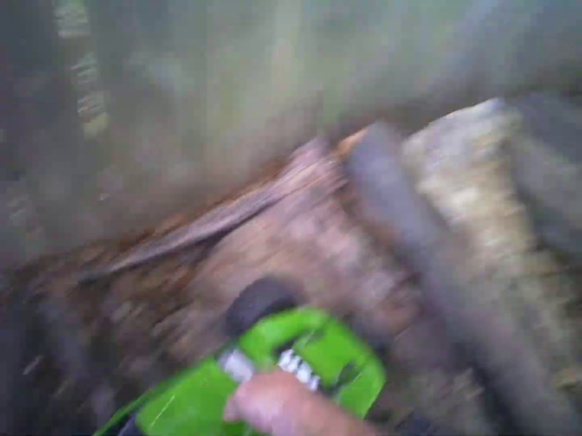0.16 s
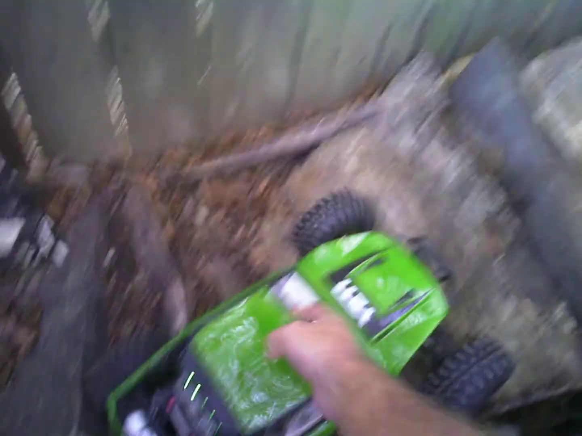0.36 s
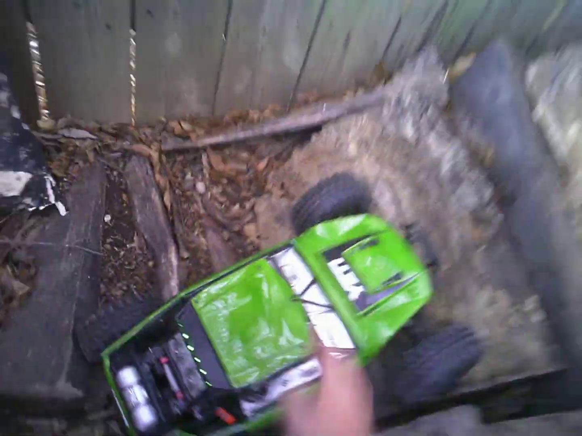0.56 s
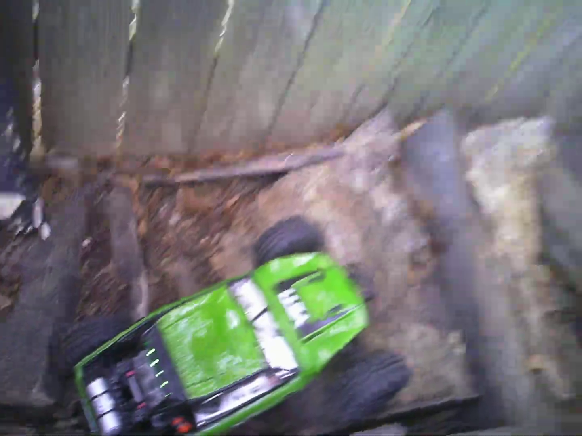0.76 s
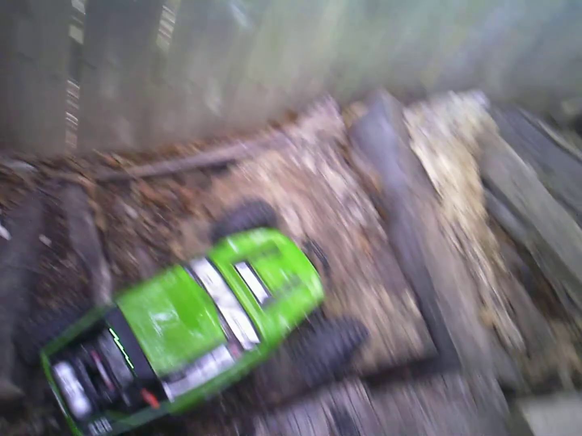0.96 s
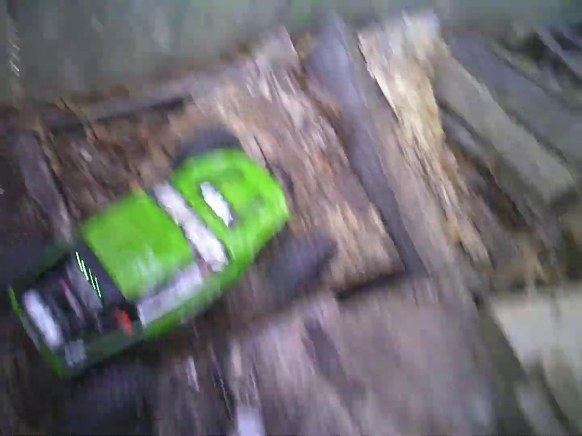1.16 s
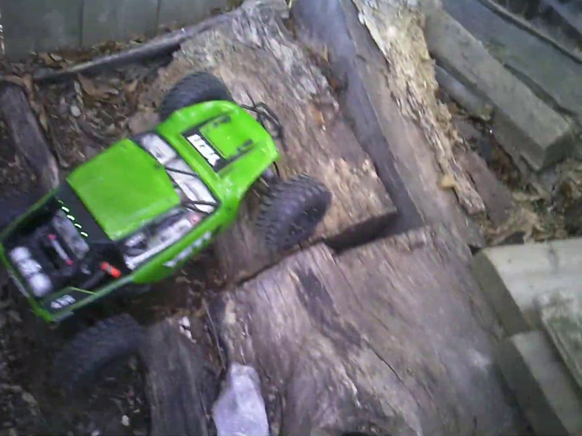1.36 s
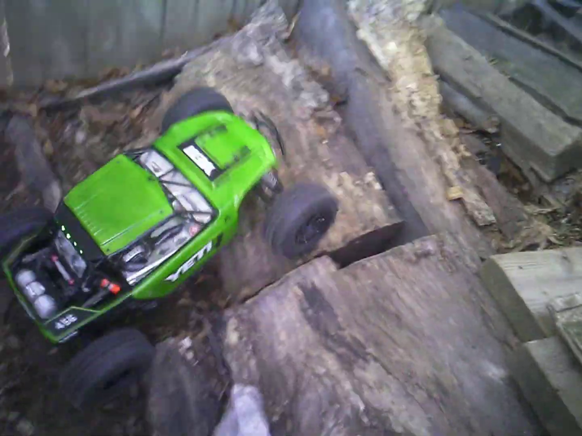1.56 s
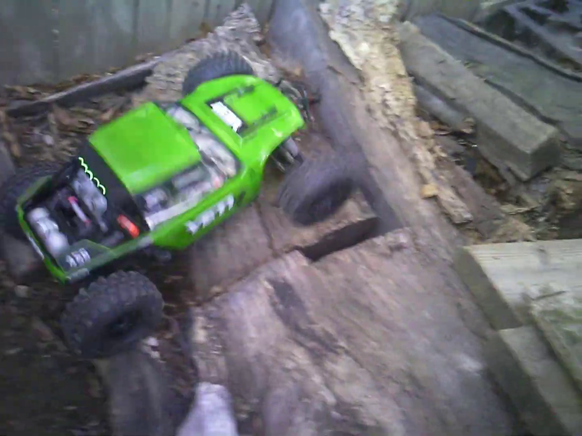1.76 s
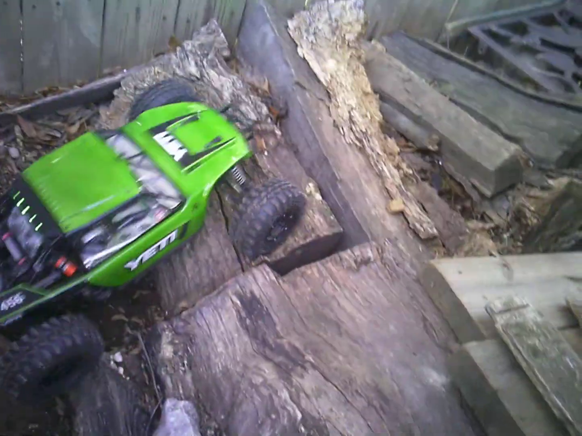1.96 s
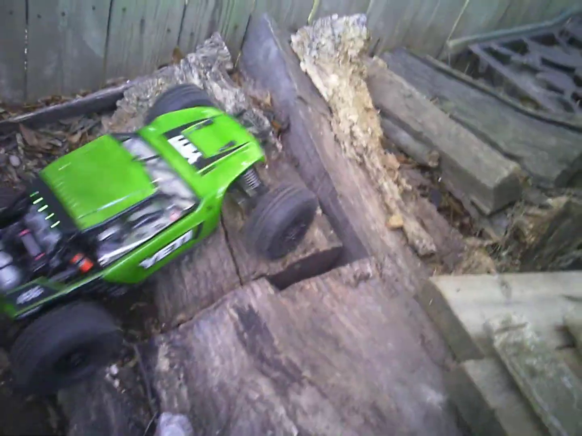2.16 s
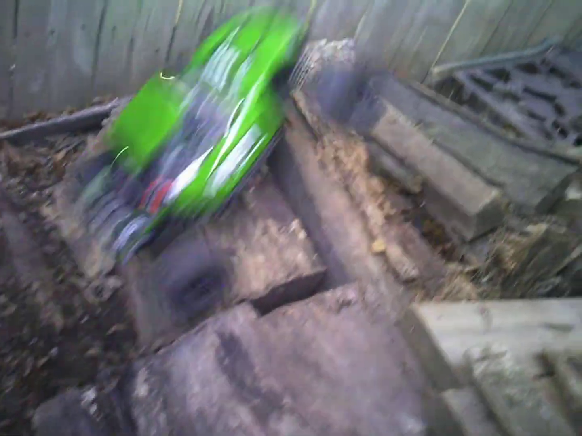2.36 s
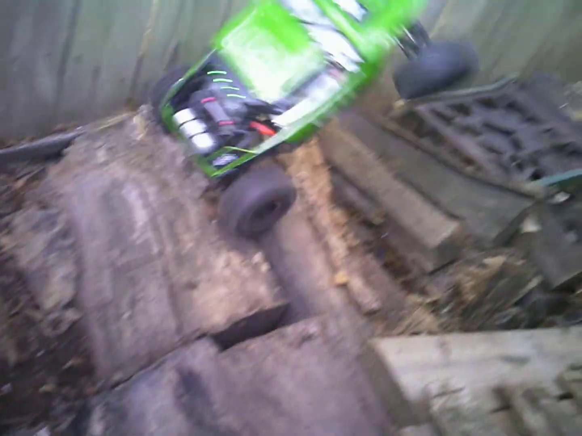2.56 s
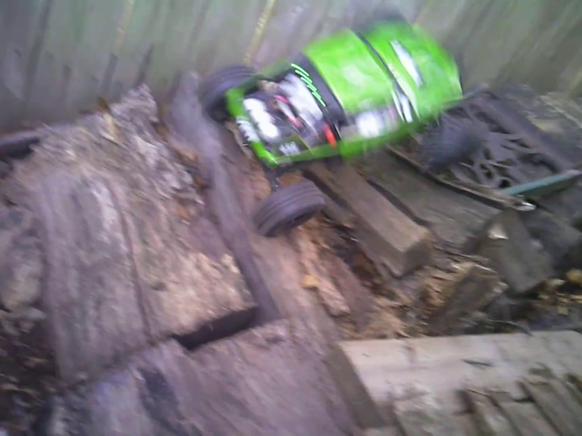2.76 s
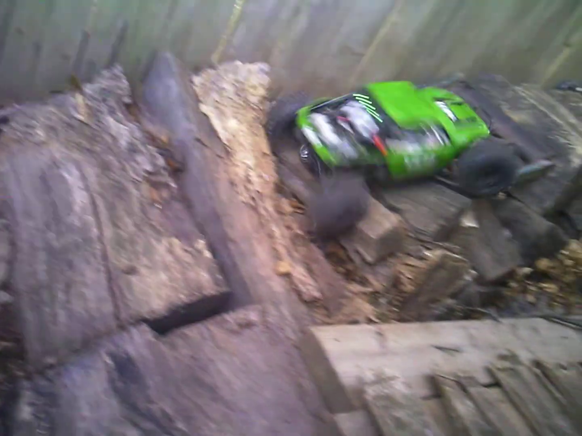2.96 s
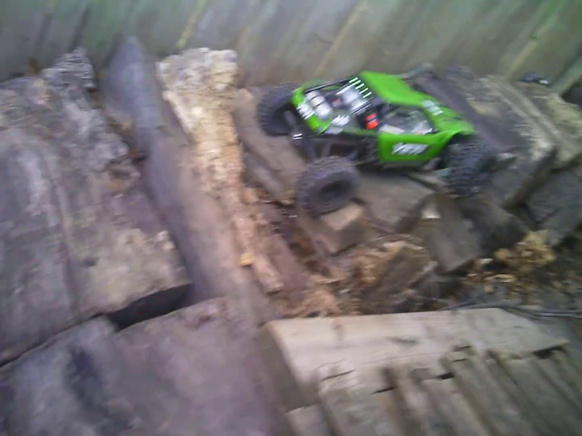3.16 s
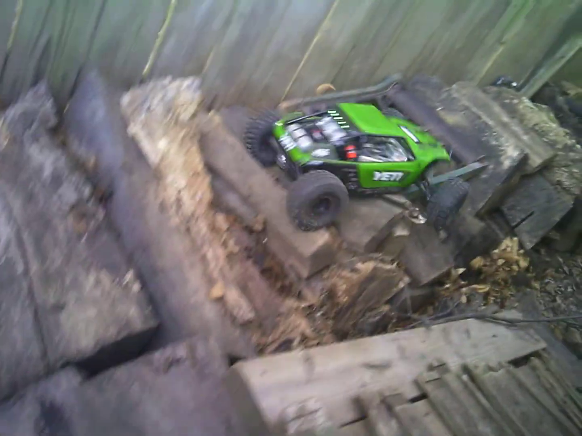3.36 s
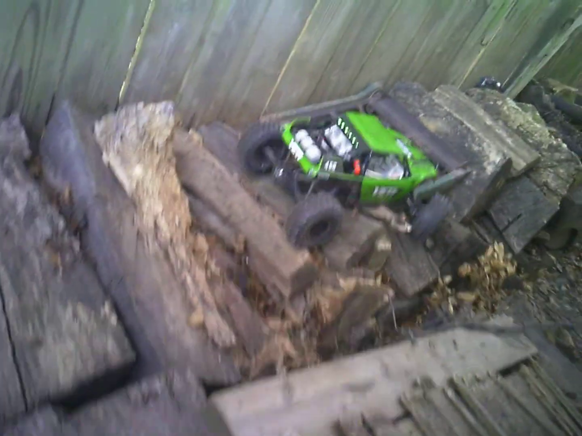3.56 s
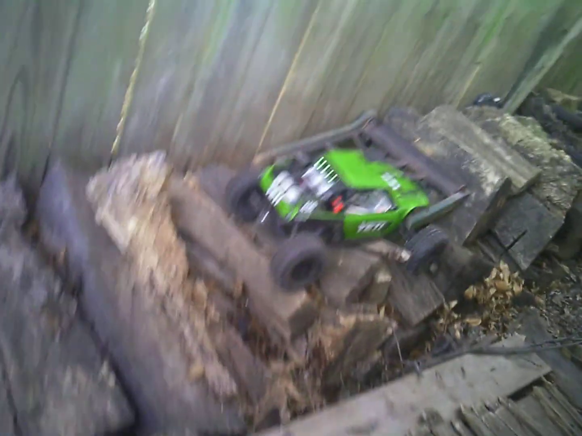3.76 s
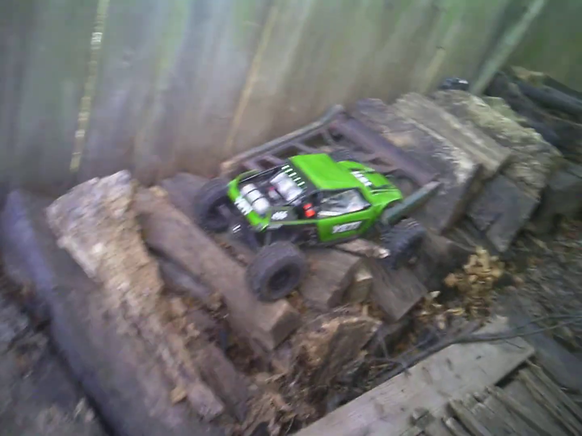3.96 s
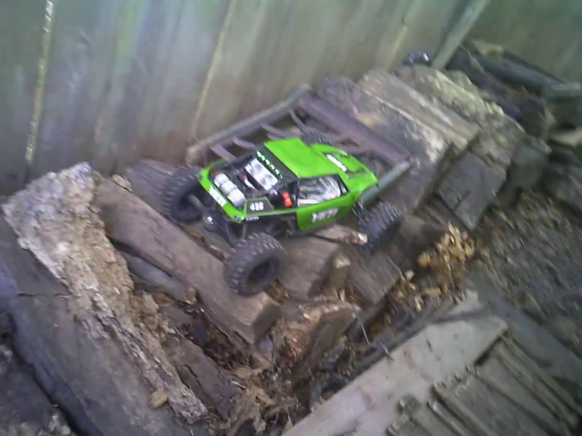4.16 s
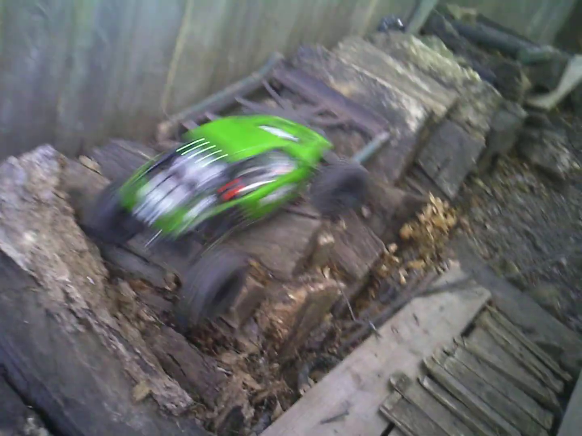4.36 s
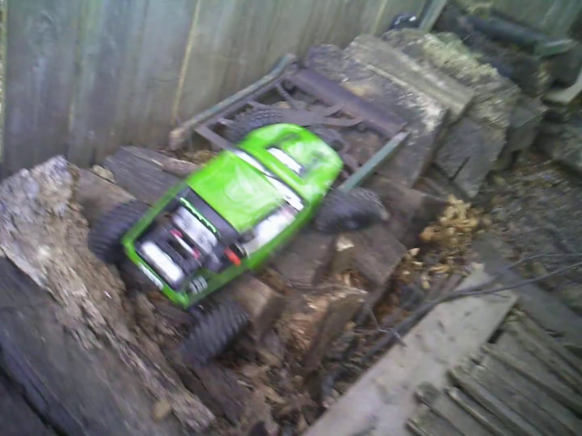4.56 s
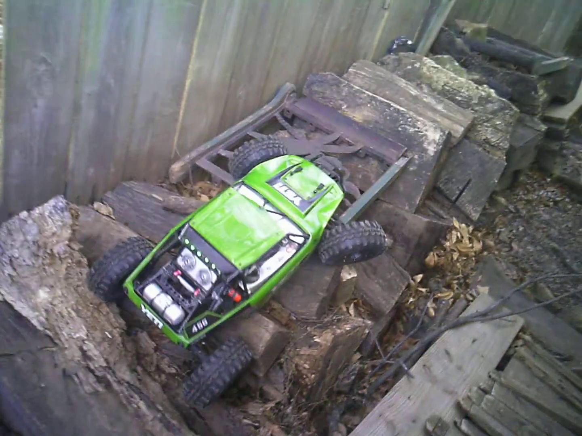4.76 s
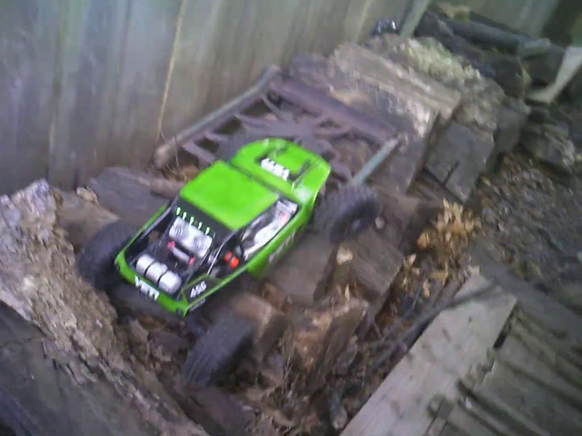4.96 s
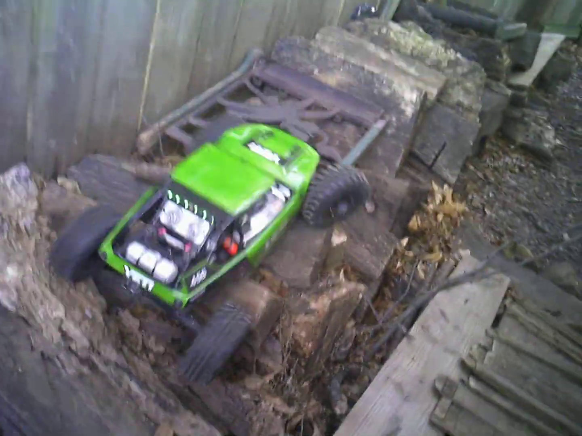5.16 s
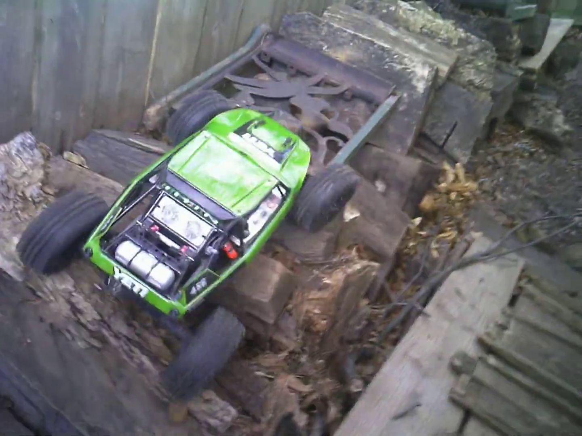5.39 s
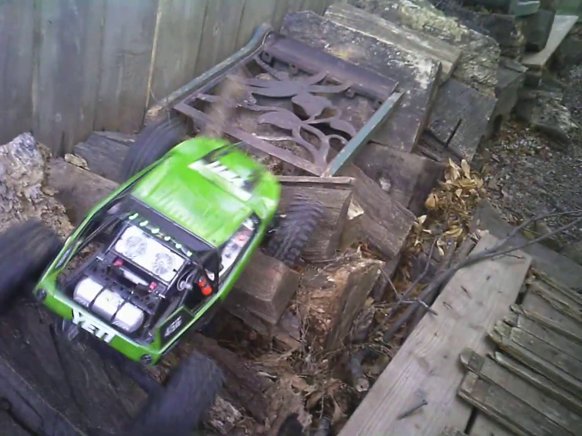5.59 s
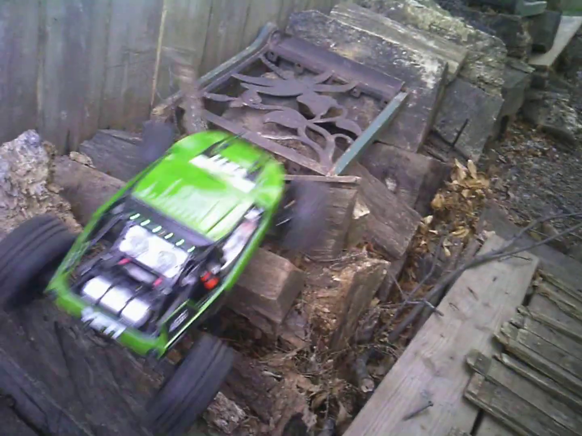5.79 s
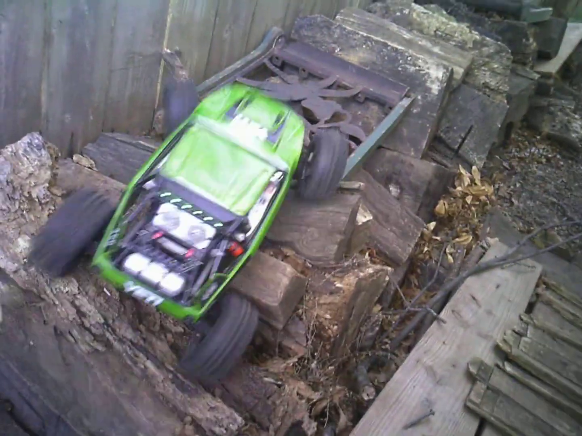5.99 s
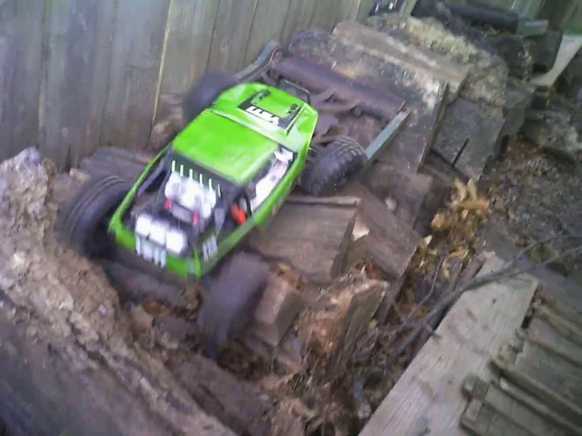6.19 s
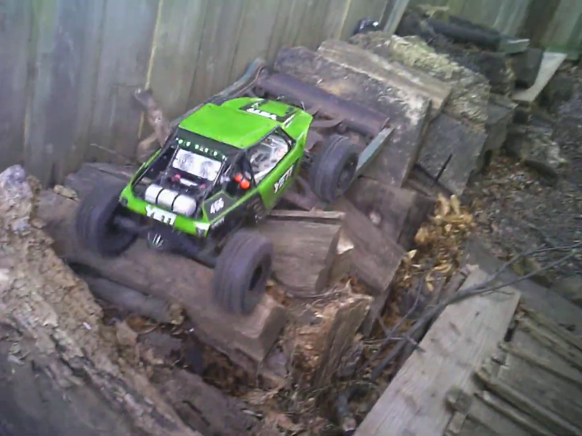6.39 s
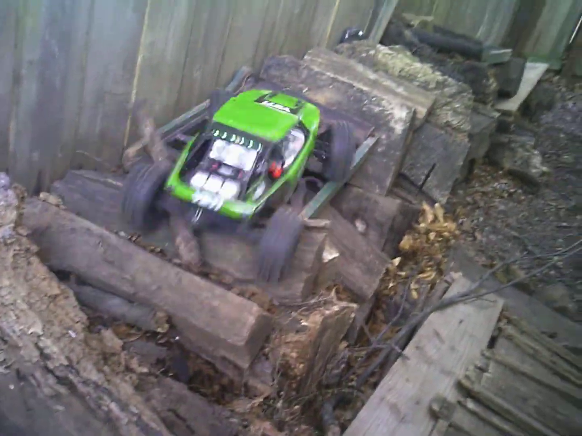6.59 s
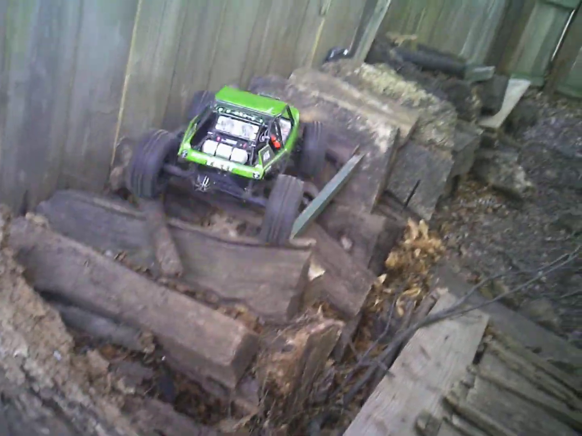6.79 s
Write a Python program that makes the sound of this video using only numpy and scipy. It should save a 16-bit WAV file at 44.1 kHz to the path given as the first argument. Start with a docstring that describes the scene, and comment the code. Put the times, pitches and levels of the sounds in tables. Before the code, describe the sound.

Soft outdoor air and small dry scrapes on bark open the scene. A tiny electric drivetrain then bursts into gritty rattling and rising and falling gear whine, loudest a little after two seconds, with sharp plastic clacks. It pauses mid-way for wood knocks and a shaky steering whirr, then crawls with a steady high-pitched motor note and lunges repeatedly. Close microphone, faint slap off fence and logs.

```python
"""A backyard log pile under dry leaves, the microphone close to a small electric radio-controlled truck.
Quiet air and faint scrapes first: tyres shift on bark, twigs snap and the plastic chassis clacks, all as short blows.
From about one second, spurts of throttle rattle the gears, made of tiny ticks ringing in a plastic shell.
The crawling motor sings near one pitch under a thin whistle; then wood knocks, gears whine and tyres land.
Last to join is the shaky whirr of the steering servo; the spurts go on to the end, with a short echo off fence and logs."""
import sys
import numpy as np
from scipy import signal
from scipy.fft import rfft, irfft
from scipy.io import wavfile
from scipy.ndimage import uniform_filter1d

SR = 44100
rng = np.random.default_rng(int(sys.argv[2]) if len(sys.argv) > 2 else 0)


def dump(signal):
    """Clip the signal to [-1, 1] and save it as 16-bit WAV at the path in sys.argv[1]."""
    limited = np.clip(np.atleast_2d(signal).T, -1, 1)
    pcm = np.round(limited * 32767).astype(np.int16)
    wavfile.write(sys.argv[1], SR, pcm)


N = 301203
TIME = np.arange(N) / SR
PUFF = SR // 4  # samples in a struck sound


def undb(db):
    """Decibels to gain."""
    return 10 ** (np.asarray(db) / 20)


def unit(x):
    """Scale to rms 1."""
    return x / np.sqrt(np.mean(x ** 2))


def curves(rows):
    """The columns of a table as control signals, straight lines between its times."""
    s, *columns = np.transpose(rows)
    return [np.interp(TIME, s, c) for c in columns]


def gate(rows, fade_s=0.0056):
    """One while a table lasts, with short fades."""
    to_nearest_end = np.minimum(TIME - rows[0][0], rows[-1][0] - TIME)
    return np.clip(to_nearest_end / fade_s + .5, 0, 1)


def walk(rate):
    """Smooth random wandering of rms 1 with rate random knots a second."""
    knots = rng.standard_normal(8192)
    path = np.interp(TIME * rate, np.arange(len(knots)), knots)
    return unit(uniform_filter1d(path, max(int(SR / rate / 2), 1)))


def flutter(rate, depth_db):
    """A bounded swaying of level; rms 1."""
    return unit(undb(depth_db * np.tanh(walk(rate))))


def colour(x, points, size=4096):
    """Ring x through a causal body with the given (f/Hz, level/dB) response; rms 1."""
    hz, db = np.transpose(points)
    f = np.maximum(np.arange(size // 2 + 1) * SR / size, 1)
    octaves_outside = np.maximum(np.log2(hz[0] / f), 0) + np.maximum(np.log2(f / hz[-1]), 0)
    response_db = np.interp(np.log(f), np.log(hz), db) - 20 * np.minimum(octaves_outside, 2)
    # folding the cepstrum forward in time gives minimum phase
    cepstrum = irfft(np.log(undb(response_db)))
    cepstrum[1:size // 2] *= 2
    cepstrum[size // 2 + 1:] = 0
    body = irfft(np.exp(rfft(cepstrum)))
    return unit(signal.fftconvolve(x, body)[:N])


def band(x, hz, width_hz):
    """One resonance, its centre kept below the top of the band."""
    return signal.lfilter(*signal.iirpeak(min(hz, SR / 2 - 2000), hz / width_hz, fs=SR), x)


def grains(rate, spread_db):
    """Random tiny impacts, about rate a second, of scattered size and either sign; rms 1."""
    size = undb(spread_db * np.clip(rng.standard_normal(N), -2, 2)) * rng.choice([-1, 1], N)
    return unit(size * (rng.random(N) < rate / SR))


def fade(t60):
    """A quarter second of exponential decay, falling 60 dB in t60 seconds."""
    return np.exp(-np.log(1000) * TIME[:PUFF] / t60)


def ring(modes, scatter):
    """A struck body: decaying sines, their pitches scattered as if by the place of contact."""
    t = TIME[:PUFF]
    out = np.zeros(PUFF)
    for hz, db, t60 in modes:
        struck_hz = hz * (1 + scatter * rng.standard_normal())
        out += undb(db) * fade(t60) * np.sin(2 * np.pi * struck_hz * t)
    return out


def burst(t60):
    """A dying puff of noise."""
    return fade(t60) * rng.standard_normal(PUFF)


def push(x, contact_s):
    """Spread a blow over its contact time."""
    t = TIME[:SR // 50]
    return signal.fftconvolve(x, t * np.exp(-t / contact_s))[:len(x)]


def add(out, s, x, db):
    """Mix a sound in at time s with the given peak level."""
    i = max(int(s * SR), 0)
    out[i:i + len(x)] += (undb(db) * x / np.abs(x).max())[:N - i]


def spell(s, length, db, rise_s, fall_s, change_db=0):
    """Level in dB that has risen 60 dB by time s, holds or drifts for its length, and falls 60 dB away."""
    end = s + abs(length)
    times = [s - rise_s, s, end, end + fall_s]
    levels = [db - 60, db, db + change_db, db + change_db - 60]
    return np.interp(TIME, times, levels, left=-140, right=-140)


def held(rows, rise_s=0.077, fall_s=0.036):
    """Gain of a tone that sounds in spells of (t/s, length/s, level/dB)."""
    return undb(np.max([spell(s, length, db, rise_s, fall_s) for s, length, db in rows], axis=0))


# tone of the outdoor air: f/Hz, relative level/dB
AIR_COLOUR = [(15, -47), (25, 1), (130, -3.5), (200, -8.5), (416, -12.5), (489, -13), (531, -13),
              (754, -14.5), (2160, -20.5), (2410, -24), (4870, -29), (7000, -34.5), (9070, -33.5),
              (14000, -30.5), (16000, -34)]


def yard(level_db=-61.5, sway_db=-2.5):
    """Quiet outdoor air: coloured noise whose level slowly sways."""
    return colour(rng.standard_normal(N), AIR_COLOUR) * undb(level_db + sway_db * walk(4.95))


# loose parts and leaves never quite settle; least levels before the bumps and the tyre trims:
# scrape level/dB, tyre rumble level/dB, leaf crunch level/dB
UNSETTLED = (-71.5, -79, -70.5)
# unpowered, the truck shifts and scrapes on the bark; levels as above:
# t/s at full level, length/s, scrape level/dB, tyre rumble level/dB, leaf crunch level/dB
SHIFTS = [(0.068, 0.016, -58.5, -50.5, -66), (0.155, 0.0054, -56, -55.5, -59),
          (0.206, 0.021, -62.5, -71, -72), (0.253, 0.092, -61, -60, -62), (0.402, 0.011, -50, -62, -63),
          (0.43, 0.025, -49.5, -60, -61), (0.683, 0.04, -56, -52.5, -54), (0.737, 0.022, -57, -46.5, -56),
          (0.864, 0.0097, -61, -75, -58), (0.939, 0.01, -59, -54, -60.5), (0.99, 0.0055, -60, -66, -58),
          (1.388, 0.016, -49.5, -47.5, -51), (3.388, 0.019, -51, -67, -55.5),
          (3.433, 0.031, -51, -77, -56.5), (3.893, 0.023, -63, -53, -57), (4.4, 0.024, -49, -45, -55),
          (4.435, 0.046, -53, -61, -68), (4.514, 0.012, -51, -55, -63), (4.563, 0.011, -51, -73, -74),
          (4.656, 0.0042, -49, -39.5, -51), (4.917, 0.029, -56.5, -54, -63),
          (5.219, 0.012, -47.5, -70, -59)]
# short spurts of driving; levels before the bumps and later trims: t/s at full level, length/s,
# rattle level/dB, its change by the end/dB, tyre rumble level/dB, leaf crunch level/dB
DRIVES = [(1.065, 0.074, -46, -0.5, -55, -62), (1.209, 0.017, -42.5, -4, -58, -63),
          (1.288, 0.057, -40, -10.5, -60, -63.5), (1.439, 0.067, -39, -0.5, -65, -53),
          (1.535, 0.12, -37, 1.5, -46.5, -55), (1.729, 0.092, -48, -2, -74, -61.5),
          (1.878, .11, -41.5, -7, -57, -63), (2.058, 0.12, -53, 9.5, -57, -79),
          (2.216, 0.083, -36, 5, -46.5, -47), (2.304, 0.17, -29.5, -7, -42.5, -48.5),
          (2.469, 0.1, -36.5, -11, -49, -59), (2.589, 0.11, -41.5, -2.5, -60.5, -64),
          (2.722, 0.1, -37, 0, -53, -51), (2.853, 0.14, -39.5, 2, -44, -55.5),
          (3.003, 0.035, -43, -3, -55.5, -56), (3.188, .01, -46, 1.5, -67, -51),
          (3.216, 0.1, -44.5, -3.5, -51.5, -56), (4.152, .02, -44, 7.5, -58, -60),
          (4.179, 0.12, -37, 0, -51.5, -51), (4.965, 0.21, -42.5, 0, -58.5, -63),
          (5.342, 0.033, -43, 2, -67, -56.5), (5.413, 0.092, -43.5, 3.5, -58, -63),
          (5.524, 0.065, -46.5, 3.5, -57, -55.5), (5.638, 0.13, -42.5, 7, -52.5, -58.5),
          (5.807, 0.069, -37, 0.5, -44.5, -47.5), (5.9, 0.051, -38.5, -6, -51, -66.5),
          (5.989, 0.17, -42.5, 4.5, -50, -63.5), (6.2, 0.16, -44.5, 5.5, -53.5, -58),
          (6.316, 0.044, -43, 8.5, -57.5, -53.5), (6.356, 0.17, -37, -2, -48, -51.5),
          (6.546, 0.087, -38, -6.5, -50.5, -56.5), (6.64, 0.15, -47.5, -1, -58.5, -66),
          (6.797, 0.029, -40.5, 1.5, -62, -56)]
# a spurt snatches at once and then runs out; each time spans 60 dB
SPURT_RISE_S, SPURT_FALL_S = 0.04, 0.27
SHIFT_RISE_S, SHIFT_FALL_S = 0.021, 0.068


def motion(bump_db=1.5, bumps_per_s=22):
    """Levels in dB of rattle, scrape, rumble and crunch; the bumpy ground shakes them together."""
    rattle_db = np.max([spell(s, length, db, SPURT_RISE_S, SPURT_FALL_S, change_db)
                        for s, length, db, change_db, _, _ in DRIVES], axis=0)
    scrape_db = np.max([spell(s, length, db, SHIFT_RISE_S, SHIFT_FALL_S)
                        for s, length, db, _, _ in SHIFTS], axis=0)
    rest_db, rumble_db, crunch_db = UNSETTLED
    spurts = DRIVES, SPURT_RISE_S, SPURT_FALL_S
    shifts = SHIFTS, SHIFT_RISE_S, SHIFT_FALL_S
    for rows, rise_s, fall_s in (spurts, shifts):
        for s, length, *_, rumble, crunch in rows:
            rumble_db = np.maximum(rumble_db, spell(s, length, rumble, rise_s, fall_s))
            crunch_db = np.maximum(crunch_db, spell(s, length, crunch, rise_s, fall_s))
    levels = np.array([rattle_db, np.maximum(scrape_db, rest_db), rumble_db, crunch_db])
    return levels + bump_db * walk(bumps_per_s)


# tone of rubber scraping on bark: f/Hz, relative level/dB
BARK_COLOUR = [(240, -27), (400, -17), (581, -10.5), (1530, 4.5), (2300, -8), (4170, -8.5), (5030, -49),
               (5650, -22), (6500, -35), (8450, -35), (14300, -120)]


def scrape(db):
    """Rubber catches and slips on rough bark: a dry, grainy rasp."""
    return colour(grains(rate=2000, spread_db=3.0), BARK_COLOUR) * undb(db)


# tone of the tread on logs: f/Hz, relative level/dB
TREAD_COLOUR = [(50, 1), (110, -5), (190, 1), (280, -3.5), (400, -1), (520, -2), (700, -1), (900, 4),
                (1200, -12)]
# tone of crushed dry leaves: f/Hz, relative level/dB
LEAF_COLOUR = [(3000, -8), (4200, 10), (5100, -12), (5800, 1), (6700, -6.5), (8300, 7), (9500, -4.5),
               (11000, -0.5), (12200, -22.5), (13000, -6), (14000, -10), (15000, -7), (16500, -15)]


def tyres(rumble_db, crunch_db, trim_db=-2):
    """Tread lugs patter on the logs and crush dry leaves, each a stream of coloured grains."""
    lugs = colour(grains(rate=600, spread_db=4), TREAD_COLOUR)
    crushing = grains(rate=1800, spread_db=2.5) * flutter(rate=51, depth_db=3.5)
    leaves = colour(crushing, LEAF_COLOUR)
    return lugs * undb(rumble_db + trim_db) + leaves * undb(crunch_db + trim_db)


# twigs and grit snapping: t/s, peak level before trim/dB, nominal centre f/Hz
TWIGS = [(0.155, -44, 8400), (0.4956, -51.5, 8400), (0.695, -43, 8300), (0.9388, -44, 14900),
         (0.9697, -41.5, 14620), (1.11, -35.5, 4130), (1.374, -28.5, 8500), (1.4162, -27, 8500),
         (2.7248, -32.5, 7760), (2.794, -29, 3800), (2.8809, -32, 7580), (2.947, -31, 3600),
         (3.308, -38, 8420), (4.2721, -30, 4400), (4.521, -41, 15200), (4.7346, -47, 11060),
         (4.909, -42, 9400), (5.8043, -25.5, 4433), (6.151, -27.5, 6550), (6.4414, -32, 5760)]


def snaps(trim_db=1, splinter_share=0.59):
    """Dry twigs and grit crack: a sharp puff of noise with a brief trail of splinters."""
    out = np.zeros(N)
    for s, db, hz in TWIGS:
        crack = burst(t60=0.0056) + splinter_share * burst(t60=0.029)
        add(out, s, band(band(crack, hz, width_hz=1800), hz, width_hz=16000), db + trim_db)
    return out


# modes of the plastic chassis: f/Hz before scatter, relative level/dB, t60/s
CHASSIS_MODES = [(830, 1.1, 0.12), (1063, 0.5, 0.082), (1430, 21, 0.052), (1608, 26.7, 0.022),
                 (1810, 24, 0.02), (2950, 24.7, 0.015), (3296, 11, 0.021), (3835, 12.5, 0.054)]
# chassis clacks and tyre blows: t/s, peak level before trim/dB, low thump relative to it before trim/dB
CHASSIS_BLOWS = [(0.261, -43.5, 7), (0.437, -40.5, 4), (0.498, -37, -21), (.738, -50, 3), (0.755, -39, 3.5),
                 (1.062, -36.5, -20), (1.104, -29.5, -14), (1.205, -34, -26), (1.419, -26, -1.5),
                 (1.439, -28, -14), (1.452, -19, -22), (1.879, -28, -20), (1.932, -30.5, -15),
                 (2.202, -27.5, -18), (2.288, -19, -35), (2.346, -24, -4), (2.447, -22, -18),
                 (2.5, -25.5, -9), (2.907, -28, -12), (2.593, -26, -28), (2.878, -24, -12),
                 (2.946, -22.5, -23), (2.976, -21, -0.5), (3.179, -39, -23), (3.212, -28, -14),
                 (3.974, -35, -25), (4.157, -31, -24.5), (4.27, -30, -39), (4.406, -36.5, -1.5),
                 (4.66, -37, 9.5), (4.91, -34.5, -18), (4.96, -28, -4.5), (4.976, -25.5, -23),
                 (5.053, -28, -15), (5.118, -34, -22), (5.338, -30, -29), (5.376, -27.5, -29),
                 (5.639, -29, -35), (5.803, -25, -25), (6.152, -24.5, -5), (6.541, -28.5, -22)]


def clacks(trim_db=-3, thump_db=-3, crack_db=-9):
    """The plastic chassis clacks, smeared by a puff of noise, and the tyre under it thumps on the log."""
    out = np.zeros(N)
    for s, db, low_db in CHASSIS_BLOWS:
        clack = signal.fftconvolve(ring(CHASSIS_MODES, scatter=0.066), burst(t60=0.013))
        add(out, s, clack, db + trim_db)
        add(out, s, band(burst(t60=0.012), hz=2070, width_hz=1400), db + crack_db)
        add(out, s, band(burst(t60=0.047), hz=616, width_hz=270), db + low_db + thump_db)
    return out


# tone of the gearbox: f/Hz, relative level/dB
GEARBOX_COLOUR = [(240, -23), (420, -13), (650, -16.5), (1100, 3.5), (1650, 3), (2050, -1), (2420, -8.5),
                  (2820, 1.5), (3280, -6.5), (3560, -4.5), (4300, -4.5), (5100, -75), (5750, -9),
                  (6600, -56), (8200, -31), (11700, -46)]
# resonances of the plastic gear housing and shell: f/Hz, width/Hz, relative level/dB
SHELL_MODES = [(900, 165, -3), (1112, 54, 4.5), (1332, 23, -5.5), (1528, 46, 3.5), (1684, 59, 1.5),
               (1795, 57, -1.5), (2000, 58, -3), (2576, 100, -2), (2810, 99, 4), (3070, 56, -9),
               (3483, 94, -2.5), (4360, 114, -8.5)]


def rattle(db, shell_db=-5.5, tick_db=-4.5, hard_db=-33, dulling=0.42):
    """Loose teeth and drive joints tick into the gearbox; the shell's resonances take turns."""
    ticks = grains(rate=3500, spread_db=3) * flutter(rate=140, depth_db=4)
    # each tick touches elsewhere, so every resonance flutters on its own
    shell = sum(undb(mode_db) * band(ticks, hz, width) * flutter(rate=70, depth_db=26)
                for hz, width, mode_db in SHELL_MODES)
    body = unit(shell) * undb(shell_db) + colour(ticks, GEARBOX_COLOUR) * undb(tick_db)
    # gentle ticks have a longer contact and lose their treble
    dull = signal.sosfiltfilt(signal.butter(2, 2300, fs=SR, output="sos"), body)
    brightness = undb(dulling * np.clip(db - hard_db, -20, 5))
    return (dull + brightness * (body - dull)) * undb(db)


# spells of crawling: t/s at full level, length/s, motor note nominal level/dB
CRAWL_SPELLS = [(1.088, 0.012, -49.5), (1.14, 0.053, -49.5), (1.232, 0.046, -49), (1.295, 0.051, -52.5),
                (1.88, 0.12, -60), (1.99, 0.29, -58), (3.225, 0.09, -55.5), (5.02, .02, -42.5),
                (5.08, 0.015, -44), (5.12, 0.059, -47), (5.345, 0.057, -50), (5.435, 0.07, -42.5),
                (5.65, 0.25, -59), (5.995, 0.14, -42.5), (6.32, 0.088, -44)]


def motor(note_hz=2908, jitter=0.0041, turning_hz=140, lower_db=-10, upper_db=-16):
    """At a crawl the windings are pulsed near one pitch; the stumbling rotor adds tones just below and above."""
    phase = 2 * np.pi * np.cumsum(note_hz * (1 + jitter * walk(400))) / SR
    stumble = 0.27 * walk(30) + 0.31 * walk(300)
    rotor = 2 * np.pi * np.cumsum(turning_hz * (1 + stumble)) / SR
    sides = undb(lower_db) * np.sin(phase - rotor) + undb(upper_db) * np.sin(phase + rotor)
    # the note is pure while the rotor is held and partly gives way to the side tones when it lurches on
    lurch = .5 + .5 * np.tanh(2 * walk(35))
    return 2 * held(CRAWL_SPELLS) * (np.sin(phase) * (1 - 0.5 * lurch) + sides * lurch)


# spells of part throttle: t/s at full level, length/s, whistle level before trim/dB
WHISTLE_SPELLS = [(1.14, 0.22, -69.5), (1.92, 0.32, -78), (5.6, 0.069, -62), (6.01, 0.097, -64),
                  (6.385, 0.18, -56.5), (6.6, 0.22, -66)]


def whistle(hz=5760, jitter=0.0098, trim_db=-2):
    """A thin, unsteady electrical whistle about an octave above the motor note."""
    drive = held(WHISTLE_SPELLS) * undb(trim_db)
    tone = np.sin(2 * np.pi * np.cumsum(hz * (1 + jitter * walk(500))) / SR)
    return np.sqrt(2) * drive * tone * flutter(rate=75, depth_db=-0.5)


# modes of the wood: f/Hz before scatter, relative level/dB, t60/s
WOOD_MODES = [(553, 2, 0.022), (524, -21.5, 0.045), (808, -1, 0.022), (1390, -31, 0.017)]
# hollow knocks of wood: t/s, peak level of the boxy part/dB
WOOD_KNOCKS = [(1.391, -33.5), (3.887, -33.5), (3.896, -23), (3.914, -25.5), (3.939, -34), (4.011, -37),
               (4.029, -44), (4.598, -48), (4.663, -19.5), (4.789, -42.5), (4.856, -47), (5.111, -43),
               (5.144, -42)]


def knocks(crack_db=-15):
    """Hollow wood under a soft tyre: the cushioned blow swells one boxy resonance and a dull crack."""
    out = np.zeros(N)
    for s, db in WOOD_KNOCKS:
        wood = push(ring(WOOD_MODES, scatter=.02), contact_s=.0002)
        add(out, s, band(wood, hz=547, width_hz=280), db)
        crack = band(burst(t60=0.038), hz=1230, width_hz=500)
        add(out, s, band(crack, hz=1360, width_hz=1300), db + crack_db)
    return out


# bursts of gear whine, one table each: t/s, mesh f before wobble/Hz, whine level before trim/dB
GEAR_REVS = [
    [(1.455, 1450, -51), (1.475, 1393, -40), (1.52, 779.5, -39), (1.535, 950, -45), (1.547, 1228, -28.5),
     (1.575, 1382, -35), (1.603, 1676, -30), (1.618, 1834, -42), (1.645, 1966, -42), (1.66, 1356, -32.5),
     (1.685, 813, -43), (1.715, 737, -56)],
    [(2.17, 1102, -49), (2.205, 1248, -39), (2.215, 1873, -35), (2.26, 2200, -32.5), (2.3, 1801, -38),
     (2.335, 2217, -36), (2.41, 1452, -46), (2.455, 1304, -35), (2.55, 941, -61)],
    [(2.7, 900, -54), (2.72, 1102, -30.5), (2.738, 1391, -36), (2.753, 1451, -38), (2.79, 1575, -27),
     (2.803, 1559, -34), (2.83, 1551, -37), (2.87, 1142, -44)],
    [(3.2, 1211, -61), (3.215, 1090, -37.5), (3.235, 1097, -45), (3.33, 1056, -55)],
    [(4.18, 1000, -48), (4.21, 1223, -43), (4.25, 1141, -34.5), (4.32, 1440, -47), (4.35, 1350, -47.5)],
    [(5.8, 782, -48), (5.87, 1090, -38.5), (5.915, 814, -43), (5.94, 756, -58)],
    [(6.32, 851, -51), (6.385, 1410, -30), (6.42, 1468, -27.5), (6.435, 1380, -42), (6.465, 1065, -37.5),
     (6.5, 1086, -32), (6.535, 1085, -46.5), (6.58, 1146, -38.5), (6.61, 1021, -43.5), (6.71, 1097, -48.5),
     (6.75, 1186, -38.5), (6.78, 1133, -50.5), (6.83, 1057, -34.5)],
]


def gears(rattle_db, wobble=0.018, trim_db=-2.5, octave_db=-8, spur_db=-11, chatter_db=-4,
          smooth_db=-39, order=6, count=28):
    """The mesh tone glides with motor speed; uneven teeth repeat each shaft turn and chatter in the gearbox."""
    speed, whine_db = curves([row for rows in GEAR_REVS for row in rows])
    pulling = sum(gate(rows) for rows in GEAR_REVS)
    # the harder the drivetrain is shaken, the rougher the teeth run
    shaking = undb(np.clip(rattle_db - smooth_db, 0, 7))
    phase = 2 * np.pi * np.cumsum(speed * (1 + wobble * shaking * walk(500))) / SR
    mesh = np.sin(phase) * flutter(rate=230, depth_db=4.5)
    # the octave flares as it crosses the housing's resonance
    octave = band(np.sin(2 * phase), hz=2800, width_hz=1100)
    octave = octave * flutter(rate=160, depth_db=7) * undb(octave_db)
    # a slower gear stage sings underneath
    spur = np.sin(2 / 3 * phase) * flutter(rate=90, depth_db=14.5) * undb(spur_db)
    whine = np.sqrt(2) * (mesh + octave + spur) * undb(whine_db + trim_db)
    # each multiple of the shaft rate swells and fades as the teeth take up their play
    chatter = sum(walk(60) * np.sin(k * phase / order + 2 * np.pi * rng.random())
                  for k in range(2, count))
    chatter = colour(chatter * pulling, GEARBOX_COLOUR) * np.sqrt(np.mean(pulling ** 2))
    return whine * pulling + chatter * undb(rattle_db + chatter_db)


# the soft tyres landing: t/s, peak level before trim/dB
TYRE_LANDINGS = [(1.649, -36.5), (2.972, -34), (5.779, -29), (6.05, -48), (6.207, -35.5), (6.612, -34)]


def landings(trim_db=-3):
    """Soft rubber tyres drop onto the logs: two low modes, cushioned by the contact."""
    out = np.zeros(N)
    for s, db in TYRE_LANDINGS:
        # f/Hz, relative level/dB, t60/s
        tyre = ring([(131, -15.5, 0.11), (202.5, -1.5, 0.061)], scatter=0.066)
        add(out, s, push(tyre, contact_s=0.00049), db + trim_db)
    return out


# the servo's gear tones: multiple of the mesh f, relative level before load/dB
SERVO_TONES = [(1, -12), (1.5, -16), (2, -10), (4.35, -14)]
# steering moves, one table each: t/s, servo mesh f before wobble/Hz, level before tone balance/dB
STEERING_MOVES = [
    [(1.76, 2400, -63), (1.83, 2270, -69), (1.9, 2430, -67), (1.97, 2200, -72)],
    [(3.62, 1920, -64), (3.67, 2390, -59), (3.71, 2100, -53), (3.76, 2422, -54), (3.8, 2160, -54),
     (3.83, 2000, -70)],
    [(4.642, 2580, -45), (4.665, 2644, -39), (4.683, 2590, -34.5), (4.7, 2200, -58), (4.74, 1616, -55)],
]


def servo(wobble=0.035, idle_db=-66, load_share=0.54):
    """The steering servo's tiny gears whirr shakily up and down."""
    out = 0
    for rows in STEERING_MOVES:
        hz, db = curves(rows)
        phase = 2 * np.pi * np.cumsum(hz * (1 + wobble * walk(460))) / SR
        # under load the mesh tone grows more than its overtones
        lag_db = load_share * np.maximum(db - idle_db, 0)
        tones = sum(undb(tone_db - lag_db * (i > 0)) * np.sin(k * phase)
                    for i, (k, tone_db) in enumerate(SERVO_TONES))
        out = out + undb(db) * gate(rows) * tones
    return out * flutter(rate=110, depth_db=4)


def fence(x, t60=0.22, wet_db=-15, delay_s=0.0073):
    """The fence and log pile scatter a short echo: decaying noise after a brief delay."""
    echo = band(burst(t60), hz=2040, width_hz=22000) * (TIME[:PUFF] > delay_s)
    return x + undb(wet_db) * signal.fftconvolve(x, echo / np.linalg.norm(echo))[:N]


def scene():
    """The truck on the log pile, in mono; motor note, whistle and air stay without echo."""
    rattle_db, scrape_db, rumble_db, crunch_db = motion()
    ground = scrape(scrape_db) + tyres(rumble_db, crunch_db)
    blows = snaps() + clacks() + knocks() + landings()
    drivetrain = rattle(rattle_db) + gears(rattle_db) + servo()
    return (fence(ground + blows + drivetrain) + yard() + motor() + whistle())[None]


def record(dry):
    """The microphone's recorder cuts the top steeply above 16.2 kHz."""
    return signal.sosfilt(signal.ellip(10, .2, 70, 16200, fs=SR, output="sos"), dry)


dry = scene()
out = record(dry)
dump(out)
```